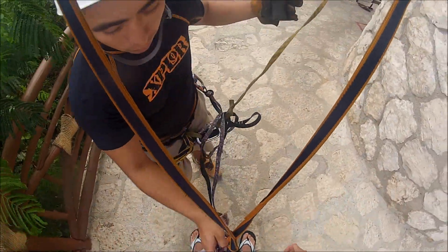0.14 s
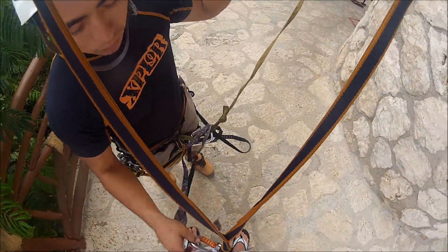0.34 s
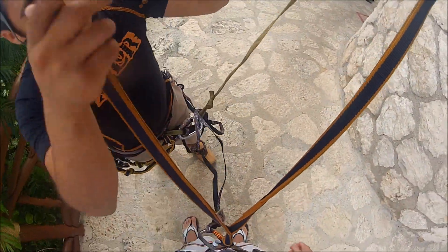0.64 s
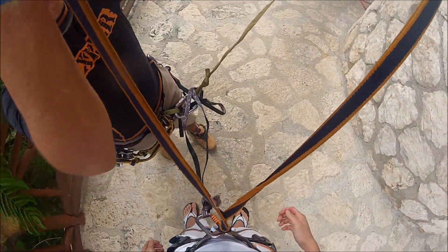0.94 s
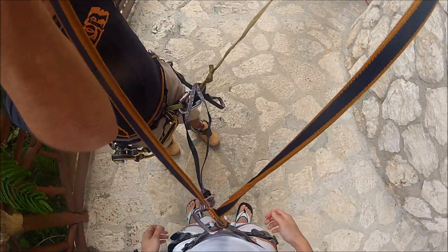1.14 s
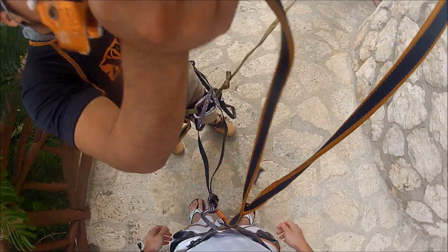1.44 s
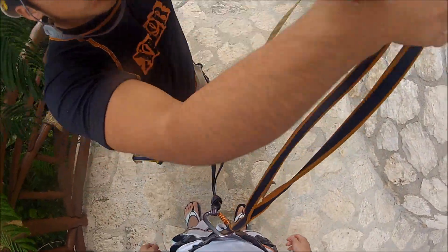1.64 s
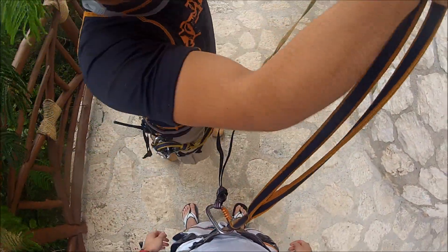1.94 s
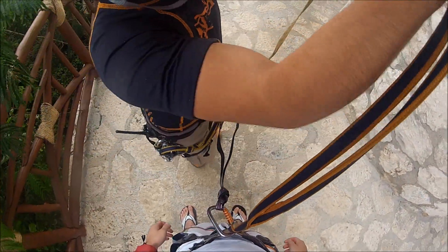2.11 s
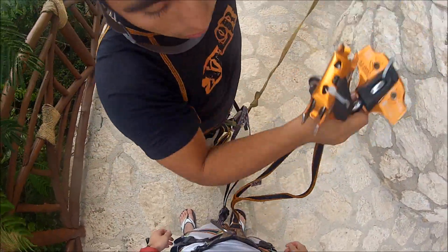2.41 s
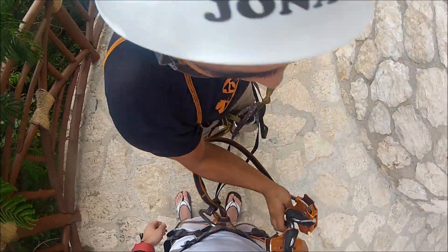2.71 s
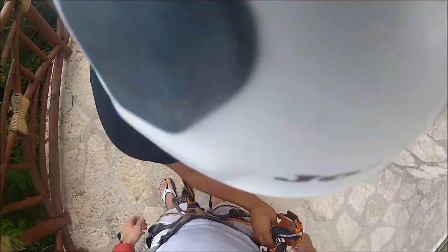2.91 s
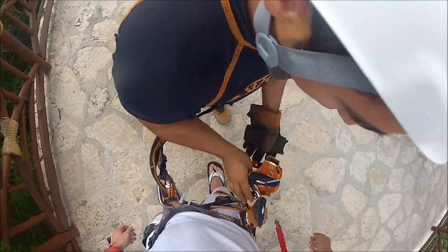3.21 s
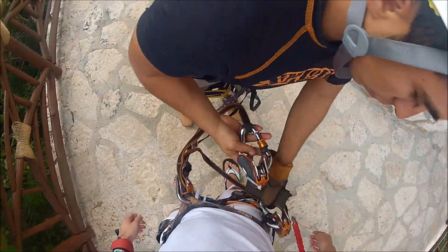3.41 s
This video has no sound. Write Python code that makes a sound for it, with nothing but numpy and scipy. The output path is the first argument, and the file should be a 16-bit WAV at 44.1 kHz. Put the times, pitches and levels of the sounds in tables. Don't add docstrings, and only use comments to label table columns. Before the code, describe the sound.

Small bright metal clinks come in clusters as climbing gear is clipped, lifted and lowered outdoors; a helmet then bangs the camera case twice, clipping, and scrapes off, with a few last clinks over low wind.

```python
import sys
import numpy as np
from scipy import signal
from scipy.fft import rfft, irfft
from scipy.io import wavfile
from scipy.ndimage import uniform_filter1d

SR = 44100
rng = np.random.default_rng(int(sys.argv[2]) if len(sys.argv) > 2 else 0)


def elevation(decibels):
    levels = np.asarray(decibels, float)
    return 10 ** (levels / 20)


def generate_wav(signal):
    frames = np.transpose(np.atleast_2d(signal))
    scaled = np.clip(frames, -1, 1) * 32767
    pcm = np.round(scaled).astype(np.int16)
    wavfile.write(sys.argv[1], SR, pcm)


N = 156555

# frequency in Hz, level in dB per Hz.
AIR_COLOUR = [(12, -31), (20, 1.5), (59, -14.5), (150, -17.5), (300, -26.5), (575, -28), (900, -27.5),
              (1500, -28), (1950, -44), (3300, -120)]
# time in seconds, wind level in dB.
WIND = [(0, 1.5), (.15, 1), (.6, 1), (.9, 0), (1.25, 1), (1.45, -4), (1.7, 4), (2.0, -0.5), (2.35, -1),
        (2.65, 2.5), (2.9, 1.5), (3.2, 2), (3.55, -4.5)]
# frequency in Hz, width in Hz, level in dB.
CASE_HUMS = [(212, 71, -64.5), (1074, 124, -69.5), (1322, 48, -76), (1880, 350, -65), (2230, 150, -72.5),
             (2900, 550, -74.5), (3524, 240, -77), (4410, 340, -80.5), (5263, 270, -75.5)]
# time in seconds, rustle level in dB.
HANDLING = [(0, -67), (.45, -67.5), (.7, -62.5), (1.0, -66), (1.2, -67), (1.5, -73), (1.8, -82), (2.1, -63),
            (2.35, -104), (2.5, -82), (2.9, -103), (3.3, -63.5), (3.55, -67)]
# centre in seconds, length in seconds, level in dB.
GROANS = [
    (1.391, 0.1, -52),
    (0.929, 0.33, -62),
    (1.624, .12, -59.5),
    (2.28, 0.15, -60),
    (2.806, 0.26, -61.5),
    (3.344, 0.31, -60),
]
# frequency in Hz, width in Hz, level in dB.
JANGLE_COLOUR = [(1900, 220, 18.5), (2900, 1170, 14), (4080, 660, -7), (4950, 290, 10)]
# frequency in Hz, level in dB.
METAL_TONES = [(1800, -19), (2130, -3), (2400, -7.5), (2850, -2.5), (3400, -4), (3650, -16), (4150, -7),
               (4500, -8), (5050, 7.5), (5350, -17.5)]
# start in seconds, peak level in dB,
# strongest ring in Hz, chatter length in seconds, brightness in dB.
CLIPPING_IN = [(0.3778, -19, 3630, 0.00064, -3), (0.454, -46, 1840, 0.0027, -21),
               (0.61, -42, 3540, 0.0048, -33), (0.636, -36.5, 2900, 0.0043, -41),
               (0.7372, -39, 2100, 0.004, -32), (0.874, -51, 2055, 0.0024, -27),
               (0.8864, -40.5, 2020, 0.0022, -33), (0.9113, -39.5, 1900, 0.0021, -27),
               (0.9625, -37.5, 3300, 0.0012, -8.5), (1.0085, -23, 5200, 0.002, -15),
               (1.055, -36, 3110, 0.0069, -18), (1.071, -37, 5020, 0.0025, -27),
               (1.094, -34.5, 3580, 0.0028, -14), (1.1119, -31.5, 3720, 0.0077, -26),
               (1.1175, -24.5, 3070, 0.0041, -24), (1.129, -26, 1765, 0.0029, -25),
               (1.135, -23.5, 5030, 0.0032, -16), (1.166, -30, 3040, 0.0025, -14),
               (1.2155, -35, 2950, 0.0017, -24), (1.4659, -34.5, 3490, 0.0018, -15),
               (1.4955, -33.5, 2885, 0.0019, -21)]
GATE_SNAP = [
    (1.2838, -21, 3500, .003, -16),
    (1.2872, -12, 2800, .0026, -7),
    (1.2935, -25, 3400, .003, -17),
]
LIFTING_OFF = [(1.744, -42.5, 2900, 0.0036, -26), (1.7588, -39, 1880, 0.0038, -11),
               (1.767, -29, 2910, 0.0036, -15.5), (1.7831, -32, 2900, 0.0028, -22),
               (1.7904, -16.5, 2280, 0.0027, -15), (1.8645, -29, 4430, 0.004, -8),
               (1.872, -20, 2970, 0.0052, -9.5), (1.8824, -22.5, 5100, 0.0032, -22),
               (1.8888, -15, 5220, 0.0037, -7), (1.9178, -24, 2770, 0.0036, -3),
               (1.935, -32.5, 2006, 0.004, -24), (1.942, -41, 1820, 0.0065, -24),
               (2.004, -35.5, 2010, 0.0053, -6), (2.0148, -27, 5100, 0.0045, -23),
               (2.032, -35.5, 1790, 0.003, -8), (2.0398, -29, 3600, 0.003, -9),
               (2.0524, -33.5, 2130, 0.0052, -19), (2.0695, -26, 2060, 0.0036, -14),
               (2.097, -31, 2850, 0.004, -13), (2.0996, -24.5, 1817, 0.0032, -21),
               (2.135, -33, 4600, 0.0034, -11), (2.155, -52, 1840, 0.006, -28)]
BRINGING_DOWN = [(2.2325, -21, 5220, 0.0051, -19), (2.2478, -24.5, 2960, 0.0043, -7.5),
                 (2.2566, -31.5, 2100, 0.011, -11.5), (2.3014, -39, 5230, 0.0068, 10),
                 (2.3128, -27, 5250, 0.0069, -2), (2.3187, -39, 5020, 0.0051, -12),
                 (2.326, -46, 1730, 0.0041, -21), (2.36, -39, 1900, 0.0022, -25),
                 (2.6274, -43, 3420, 0.0073, -21), (2.8845, -41, 2840, 0.0044, -14.5),
                 (3.2743, -35.5, 5240, 0.0047, -17), (3.2966, -16, 1960, 0.0016, -16),
                 (3.301, -27, 2155, 0.0087, -12), (3.46, -48, 5440, 0.0036, -17)]
FURTHER_CLINKS = [(2.0625, -33.5, 3600, .007, -24), (1.9865, -48, 1840, .004, -27),
                  (2.152, -42, 2000, 0.0025, -28), (3.2915, -43, 2000, 0.0027, -20),
                  (3.2965, -26, 4170, 0.0016, -17), (3.3025, -35, 2960, .006, -17),
                  (3.3123, -35, 3200, .005, -17), (3.3202, -37, 1900, .003, -23),
                  (3.326, -37.5, 2920, 0.0047, -22), (3, -43, 2350, 0.0053, -22), (3.345, -47, 2200, 0.007, -19),
                  (1.285, -20.5, 3460, 0.0031, -29), (1.2885, -21.5, 2100, 0.0024, -22),
                  (1.304, -53, 2300, 0.0035, -22), (1.312, -55, 2640, .004, -20),
                  (1.0095, -31, 3400, 0.0024, -15), (1.801, -33.5, 2200, 0.0035, -18),
                  (2.3, -40, 3000, .002, -13), (2.3, -38, 4800, .004, -7), (2.081, -40, 1900, .006, -20),
                  (2, -39, 2400, .005, -18), (1.905, -38, 2000, 0.0054, -21), (3.2775, -36, 1950, 0.0055, -25),
                  (2.2635, -35, 2100, .004, -17), (.68, -52.5, 2700, .004, -25), (.793, -49.5, 2930, .003, -29),
                  (.828, -47, 2700, 0.0025, -25), (1.135, -27, 5050, .004, 5), (2.316, -30, 5200, .004, 5),
                  (.392, -38, 3500, .004, -18), (.774, -48, 2900, .003, -25), (.862, -47, 3500, .002, -12)]
# start in seconds, level in dB, push length in seconds, crack level in dB,
# thud in Hz, free ring in Hz, free ring level in dB.
KNOCKS = [
    (2.9753, 11.5, .0003, -20, 160, 236, -14),
    (3.0072, 0, .0016, -23, 258, 270, -16),
]
# frequency in Hz, level in dB, time to fall 60 dB in seconds.
SHELL_TONES = [(453, -28, 0.025), (609, -16, 0.024), (759, -27, 0.024), (1230, -35, 0.021),
               (2230, -35, 0.044)]
# centre in seconds, length in seconds, frequency in Hz, level in dB.
RUB_SWELLS = [
    (3.0735, .010, 225, -12),
    (3.0672, .013, 285, -19),
    (3.0781, .005, 225, -17),
    (3.0735, .009, 475, -21),
    (3.0795, .006, 560, -29),
    (3.083, .01, 720, -35),
    (3.086, .012, 210, -33),
]
# frequency in Hz, width in Hz, level in dB.
SCRAPE_COLOUR = [(397, 370, 25), (810, 1700, 7.5), (2080, 760, -17), (3600, 1000, -44)]

AIR_DB, WIND_TOP_HZ, GUST_DB, FLICKER_DB = -55, 159, 2, 2
WHIRR_HZ, WHIRR_WIDTH_HZ, WHIRR_DB, WHIRR_ENDS_S = 1105, 150, -62.5, 0.94
RUSTLE_SCATTER_DB, GROAN_WIDTH_HZ = 4, 47
MODE_SCATTER_DB, MODE_DETUNE = 2, 0.02
STRONGEST_DB, STRONGEST_T60_S = 3, 0.03
RING_T60_S, RING_SLOPE = 0.032, 1.2
BRIGHT_FROM_HZ, USUAL_BRIGHT_DB, THIN_HZ = 3900, -11, 1650
CHATTER_PER_S, CHATTER_SCATTER_DB, RISE_S = 5000, 3, 0.001
JANGLE_DB, JANGLE_T60_S = -23.5, 0.12
CONTACT_S, THUD_T60_S, FREE_T60_S = 0.010, 0.017, 0.15
PARTNER_HZ, PARTNER_DB = 310, -12
CRACK_S, RATTLE_DB, RATTLE_T60_S = 0.003, -4, 0.07
RUB_S, RUB_RISE_S, RUB_FALL_S, RUB_DB = 3.080, 0.016, 0.007, -27
CAMERA_TOP_HZ, CEILING, OUTPUT_TOP_HZ = 5720, 0.51, 15250


def fade60(t, t60):
    return np.exp(-np.log(1000) * t / t60)


def ring(t, hz, t60):
    t = np.maximum(t, 0)
    return np.sin(2 * np.pi * hz * t) * fade60(t, t60)


def band(x, hz, width):
    return signal.lfilter(*signal.iirpeak(hz, hz / width, fs=SR), x)


def band_twice(x, hz, width):
    return band(band(x, hz, width), hz, width)


def unit(x):
    return x / np.sqrt(np.mean(x ** 2))


def walk(rate):
    k = int(SR / rate)
    steps = np.repeat(rng.standard_normal(N // k + 1), k)
    smooth = uniform_filter1d(uniform_filter1d(steps, k), k)
    return unit(smooth[:N])


def add(out, start, x):
    i = int(start * SR)
    out[i:i + len(x)] += x[:N - i]


def air():
    f = np.maximum(np.fft.rfftfreq(N, 1 / SR), 1)
    hz, db = np.array(AIR_COLOUR).T
    colour = elevation(np.interp(np.log(f), np.log(hz), db)) * (f > 8) / (1 + (f / 1500) ** 2)
    still = unit(irfft(rfft(rng.standard_normal(N)) * colour, N)) * elevation(AIR_DB)
    low = irfft(rfft(still) / (1 + (f / WIND_TOP_HZ) ** 4), N)
    wind_db = np.interp(np.arange(N) / SR, *np.array(WIND).T) + GUST_DB * walk(5.5)
    out = still - low + low * elevation(wind_db)
    swell = walk(3.6)
    for hz, width, db in CASE_HUMS:
        hum = unit(band_twice(rng.standard_normal(N), hz, 1.16 * width))
        out += hum * elevation(db + 1.04 * swell + FLICKER_DB * walk(8.72))
    return out


def whirr():
    fade = 1 / (1 + (np.arange(N) / SR / WHIRR_ENDS_S) ** 6)
    noise = unit(band_twice(rng.standard_normal(N), WHIRR_HZ, WHIRR_WIDTH_HZ))
    return noise * elevation(WHIRR_DB) * fade


def jangle(x):
    return unit(sum(elevation(db) * band(x, hz, width) for hz, width, db in JANGLE_COLOUR))


def rustle():
    t = np.arange(N) / SR
    ticks = rng.standard_normal(N) * elevation(RUSTLE_SCATTER_DB * walk(300))
    handled = jangle(ticks) * elevation(np.interp(t, *np.array(HANDLING).T))
    groan = unit(band_twice(rng.standard_normal(N), CASE_HUMS[0][0], GROAN_WIDTH_HZ))
    swells = sum(elevation(db) * np.exp(-(2 * (t - s) / length) ** 2) for s, length, db in GROANS)
    return handled + groan * swells


def clinks():
    out, t = np.zeros(N), np.arange(SR // 5) / SR
    short = t[:SR // 20]
    hz, db = np.array(METAL_TONES).T[:, :, None]
    t60 = RING_T60_S * (2000 / hz) ** RING_SLOPE
    rise = 1 - np.exp(-t / RISE_S)
    events = CLIPPING_IN + GATE_SNAP + LIFTING_OFF + BRINGING_DOWN + FURTHER_CLINKS
    for start, peak_db, top_hz, length, bright_db in events:
        level_luck, pitch_luck = rng.standard_normal((2, len(METAL_TONES), 1))
        timing, force, side, hiss = rng.standard_normal((4, len(t)))
        lift = np.where(hz > BRIGHT_FROM_HZ, bright_db - USUAL_BRIGHT_DB, 0)
        levels = elevation(db + lift + MODE_SCATTER_DB * level_luck)
        body = (levels * ring(short, hz * (1 + MODE_DETUNE * pitch_luck), t60)).sum(axis=0)
        top_t60 = STRONGEST_T60_S * (2000 / top_hz) ** RING_SLOPE
        body = body + elevation(STRONGEST_DB) * top_hz / 2000 * ring(short, top_hz, top_t60)
        odds = np.argsort(np.argsort(timing)) / len(t)
        hits = np.clip((CHATTER_PER_S / SR - odds) * SR / 100, 0, 1)
        contacts = hits * elevation(CHATTER_SCATTER_DB * force) * np.sign(side)
        shape = rise * np.exp(-(t / max(length, 1e-3)) ** 2)
        main_contact = (t == t[20]) * 0.59
        clink = signal.fftconvolve(contacts * shape + main_contact, body)[:len(t)]
        tail = jangle(hiss) * rise * fade60(t, JANGLE_T60_S)
        add(out, start - 0.001, elevation(peak_db) * (clink / np.abs(clink).max() + elevation(JANGLE_DB) * tail))
    return signal.sosfilt(signal.butter(3, THIN_HZ, "high", fs=SR, output="sos"), out)


def gritty(x):
    return unit(sum(elevation(db) * band_twice(x, hz, width) for hz, width, db in SCRAPE_COLOUR))


def thud(t, loaded_hz, free_hz, free_db):
    cycles = free_hz * t - (free_hz - loaded_hz) * CONTACT_S * np.tanh(t / CONTACT_S)
    fall = fade60(t, THUD_T60_S) + elevation(free_db) * fade60(t, FREE_T60_S)
    partner = elevation(free_db + PARTNER_DB) * ring(t, PARTNER_HZ, FREE_T60_S)
    return np.sin(2 * np.pi * cycles) * fall - partner


def knocks():
    out, t = np.zeros(N), np.arange(SR // 5) / SR
    shell = sum(elevation(db) * ring(t, hz, t60) for hz, db, t60 in SHELL_TONES)
    for start, level_db, push_s, crack_db, thud_hz, free_hz, free_db in KNOCKS:
        push = np.sin(np.pi * np.clip(t / push_s, 0, 1))
        body = shell + thud(t, thud_hz, free_hz, free_db - level_db)
        blow = -signal.fftconvolve(push / push.sum(), body)[:len(t)]
        snap, loose = rng.standard_normal((2, len(t)))
        crack = unit(band(band(snap, 2220, 780), 2140, 840)) * np.exp(-t / CRACK_S)
        rattle = gritty(loose) * fade60(t, RATTLE_T60_S)
        add(out, start, elevation(level_db) * blow + elevation(crack_db) * (crack + elevation(RATTLE_DB) * rattle))
    return signal.sosfilt(signal.butter(2, 84, "high", fs=SR, output="sos"), out)


def rub():
    t = np.arange(N) / SR
    swell = np.zeros(N)
    for s, length, hz, db in RUB_SWELLS:
        tone = np.cos(2 * np.pi * hz * (t - s + 0.0011))
        swell += elevation(db) * tone * np.exp(-(2 * (t - s) / length) ** 2)
    grit = rng.standard_normal(N) * elevation(3.6 * rng.standard_normal(N))
    shape = np.exp(-((t - RUB_S) / np.where(t < RUB_S, RUB_RISE_S, RUB_FALL_S)) ** 2)
    return swell + elevation(RUB_DB) * shape * gritty(grit)


def scene():
    return (air() + whirr() + rustle() + clinks() + knocks() + rub())[None]


def low_pass(x):
    return signal.sosfilt(signal.butter(12, 16540, fs=SR, output="sos"), x)


def record(dry):
    dull = signal.sosfilt(signal.butter(6, CAMERA_TOP_HZ, fs=SR, output="sos"), dry[0])
    coarse = np.clip(signal.resample_poly(dull, 40, 147), -CEILING, CEILING)
    held = signal.resample_poly(np.repeat(coarse, 4), 147, 160)[:N]
    top_cut = signal.ellip(8, 0.1, 70, OUTPUT_TOP_HZ, fs=SR, output="sos")
    mix = signal.sosfiltfilt(top_cut, held)[None]
    return low_pass(mix)


dry = scene()
out = record(dry)
generate_wav(out)
```